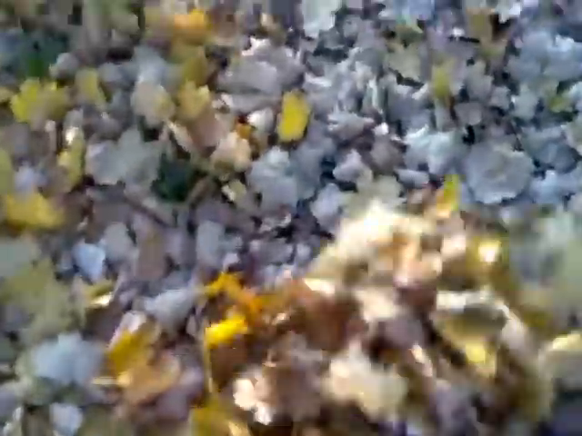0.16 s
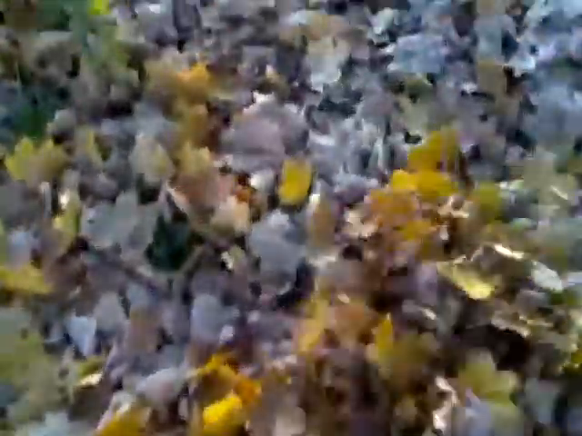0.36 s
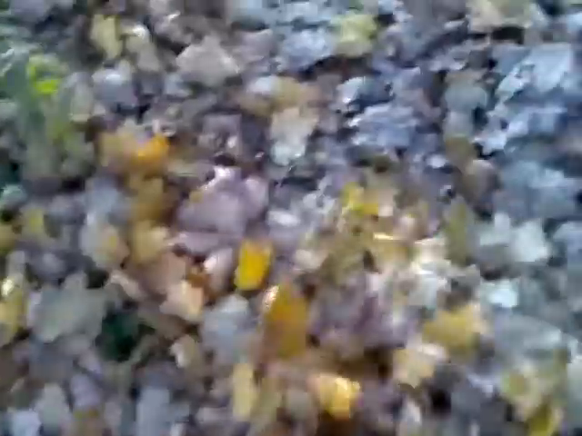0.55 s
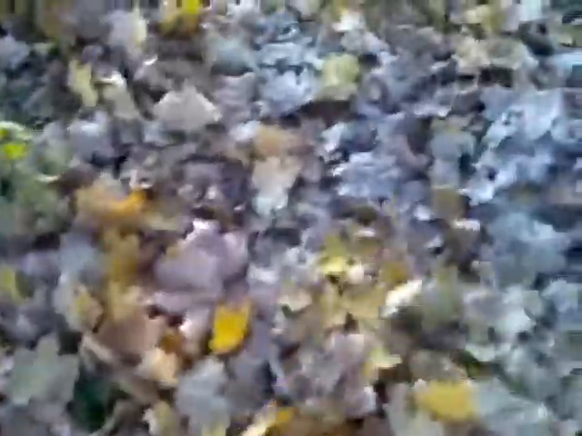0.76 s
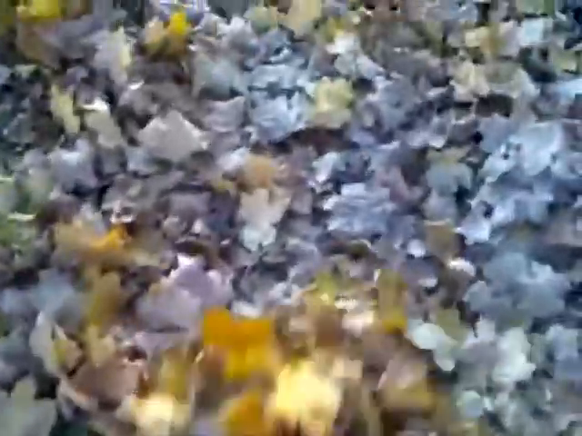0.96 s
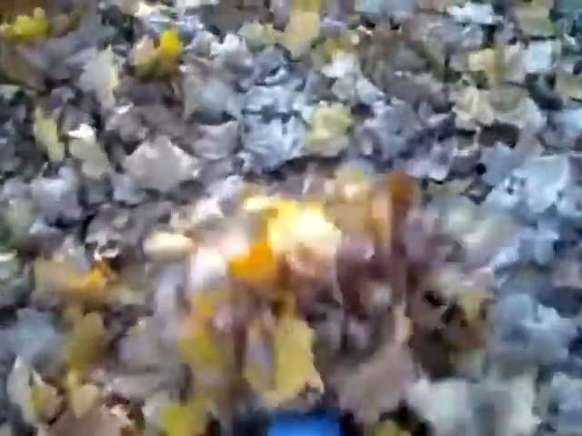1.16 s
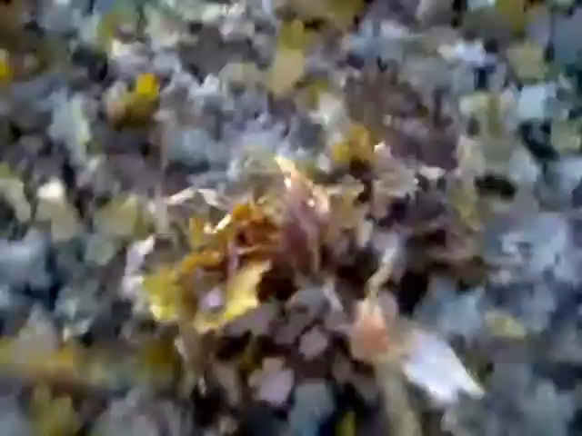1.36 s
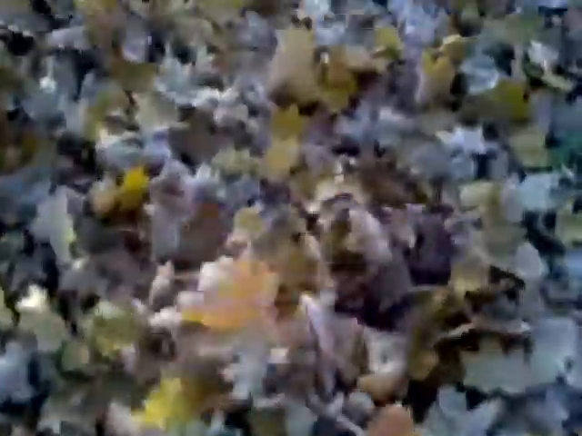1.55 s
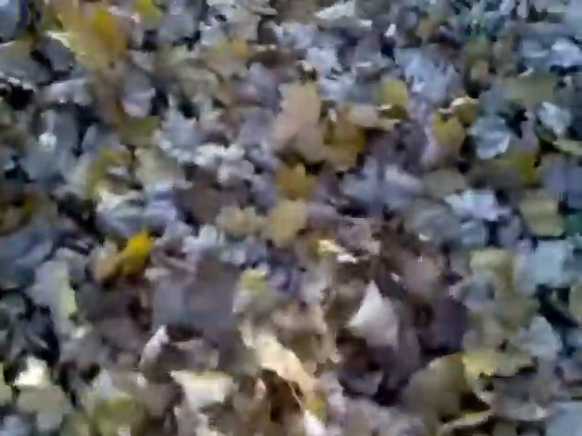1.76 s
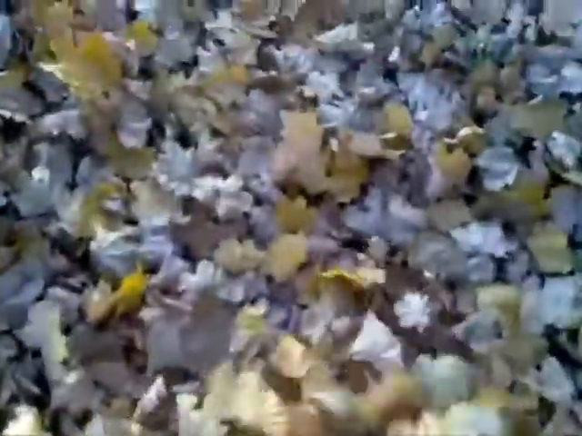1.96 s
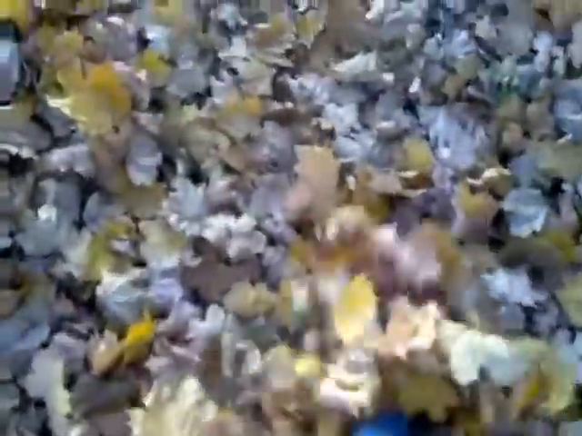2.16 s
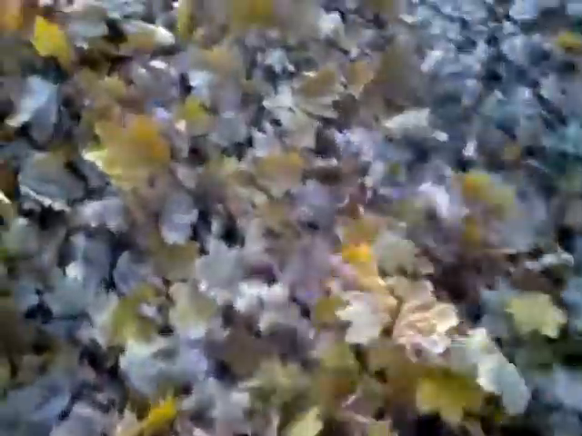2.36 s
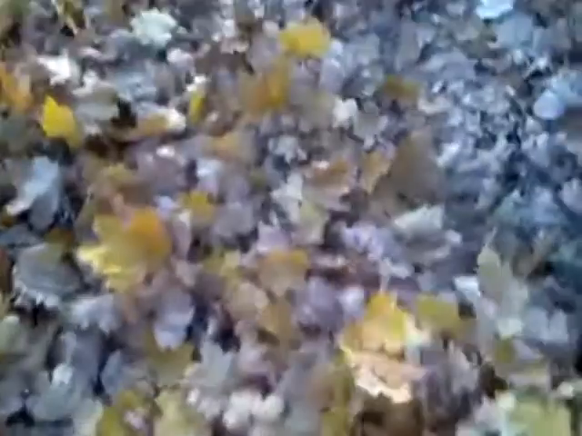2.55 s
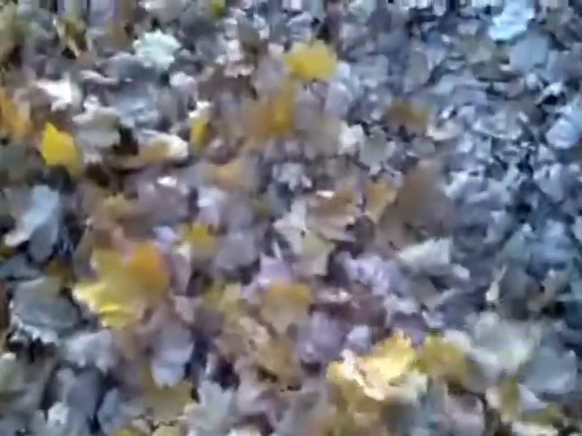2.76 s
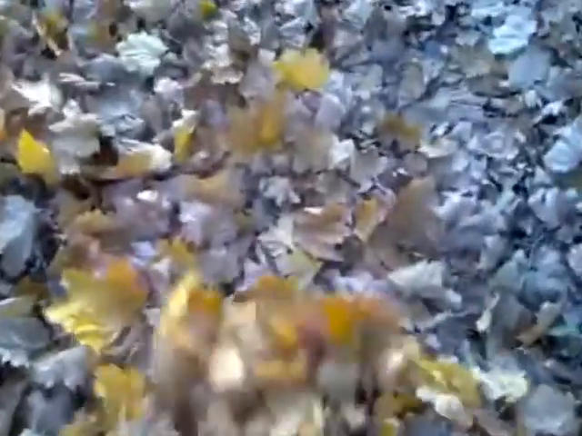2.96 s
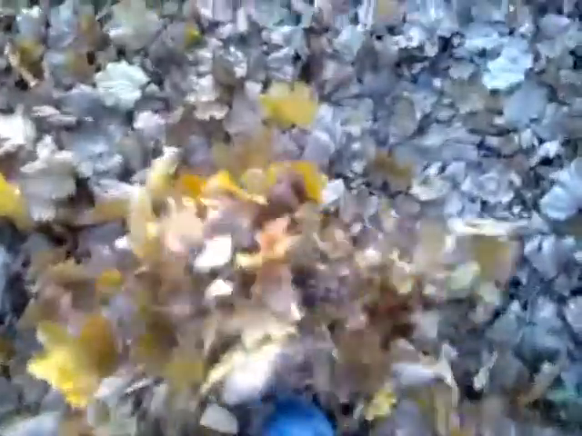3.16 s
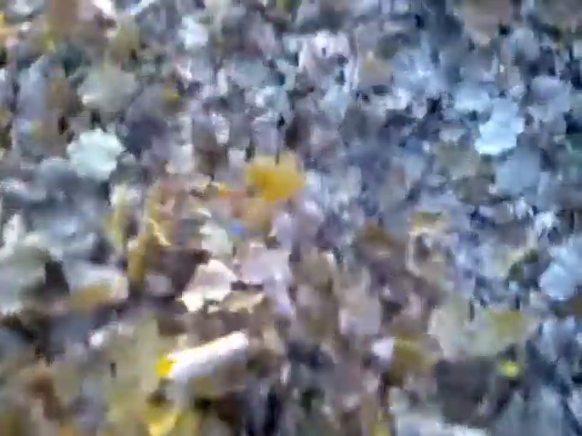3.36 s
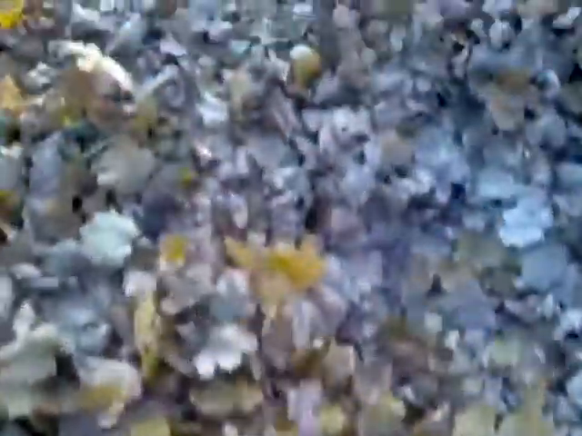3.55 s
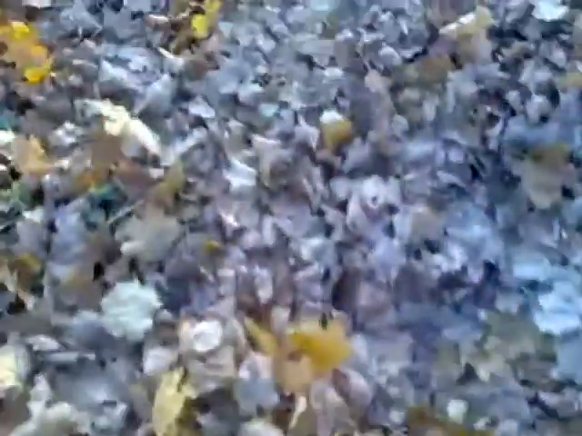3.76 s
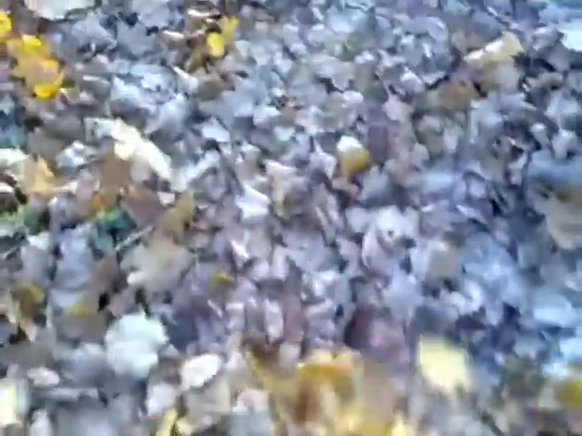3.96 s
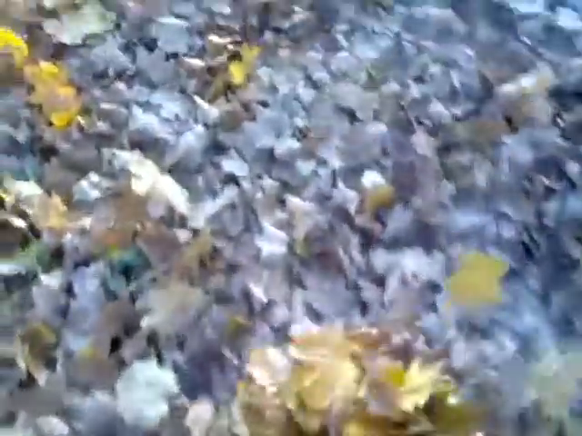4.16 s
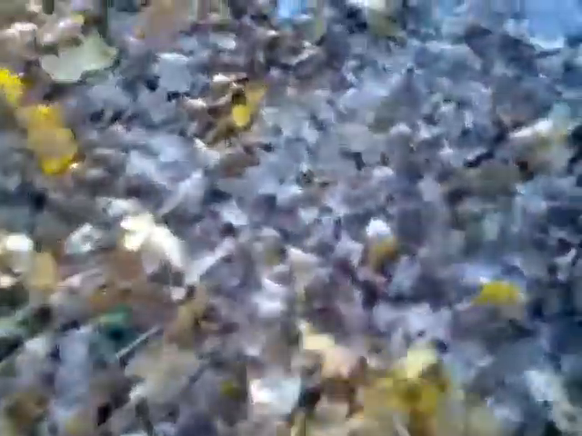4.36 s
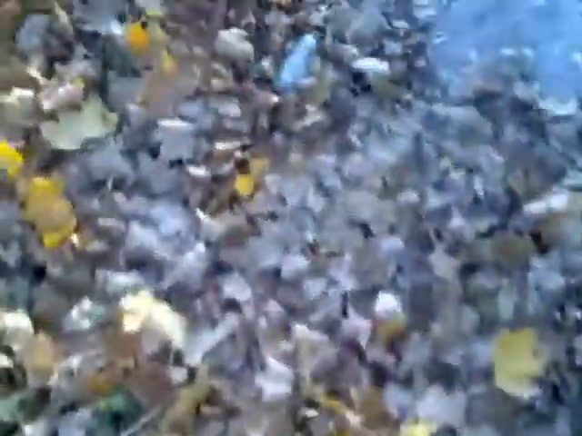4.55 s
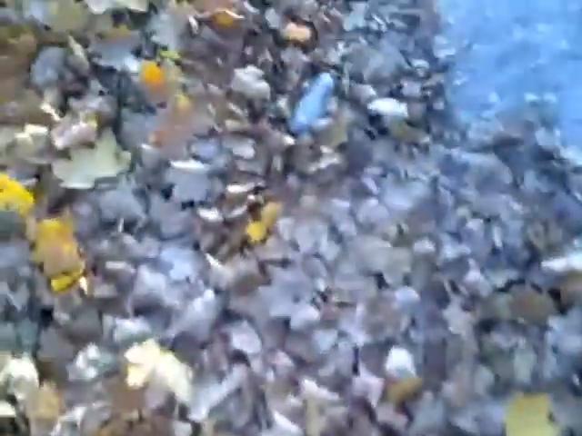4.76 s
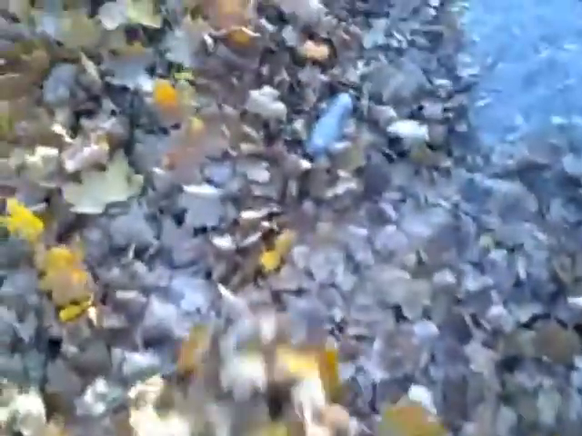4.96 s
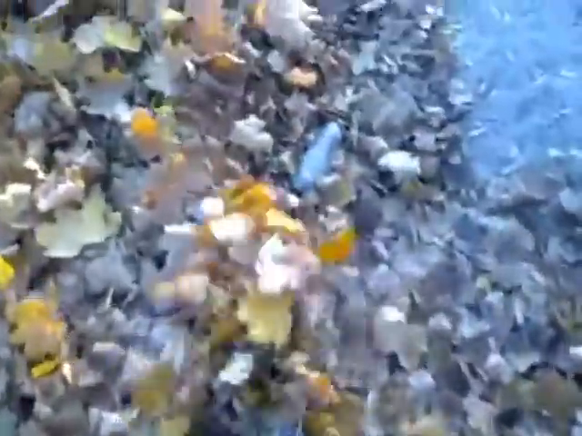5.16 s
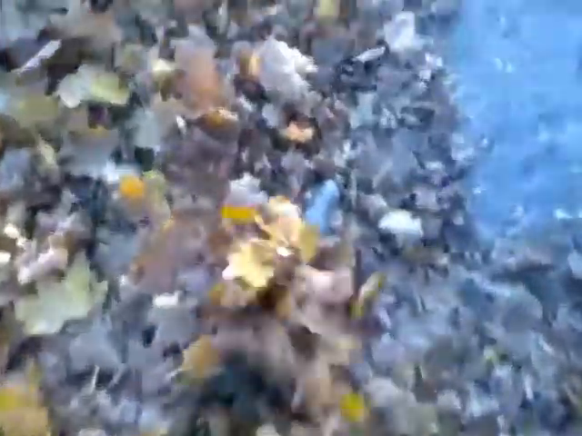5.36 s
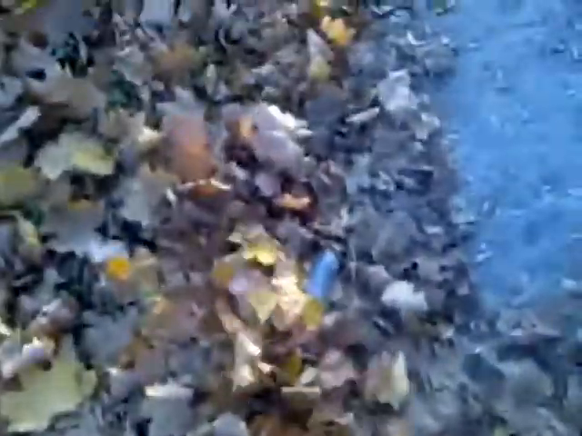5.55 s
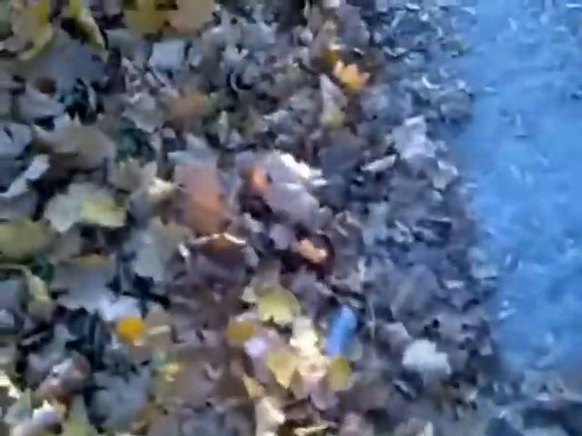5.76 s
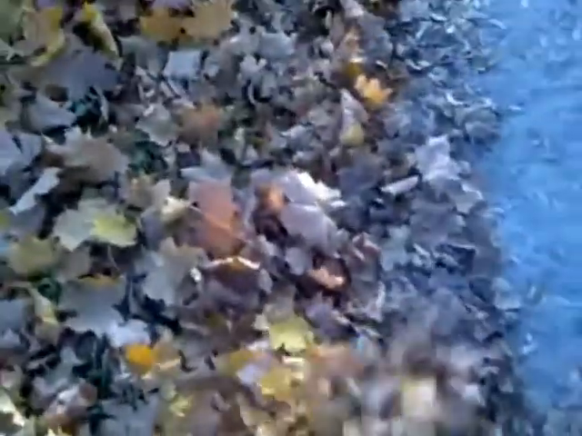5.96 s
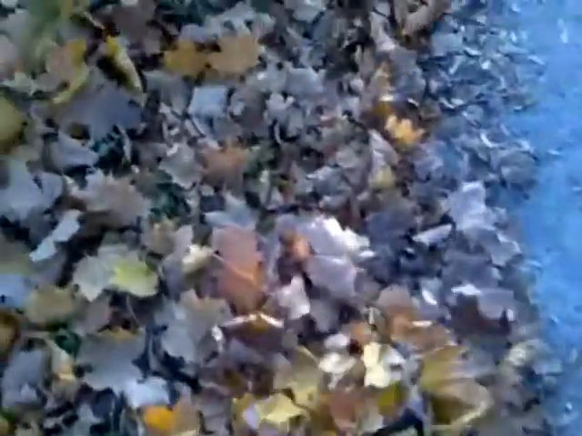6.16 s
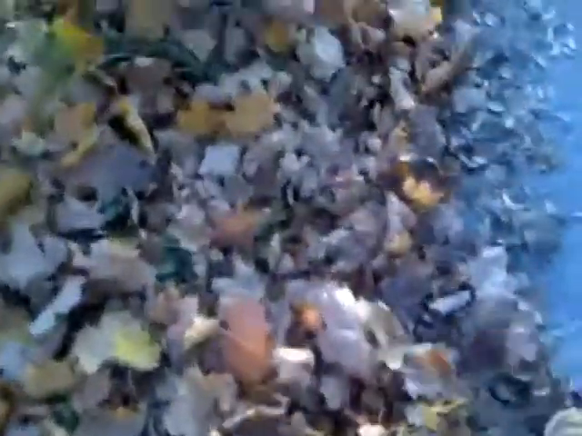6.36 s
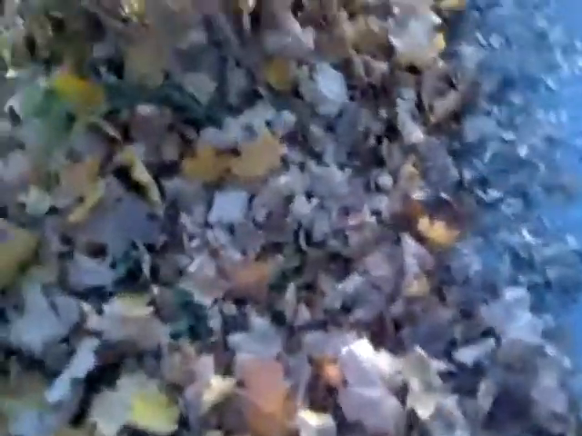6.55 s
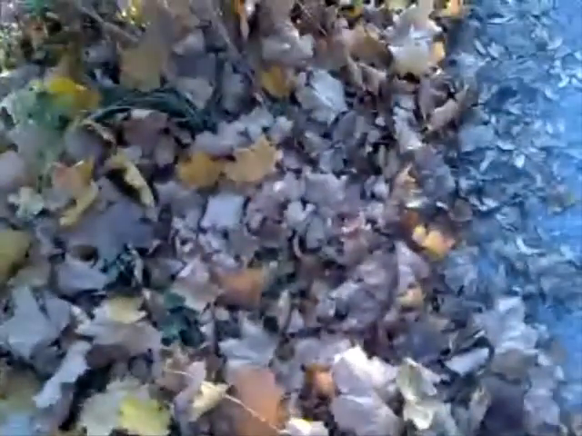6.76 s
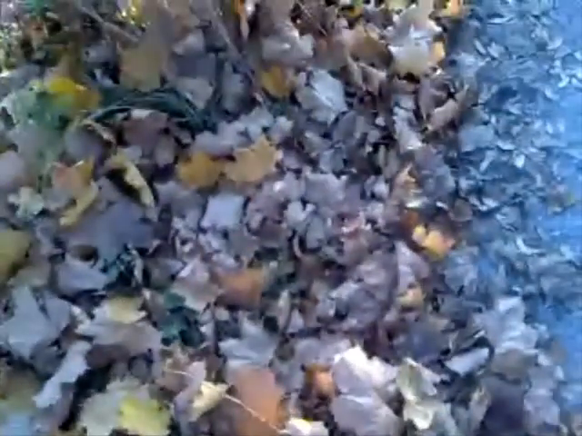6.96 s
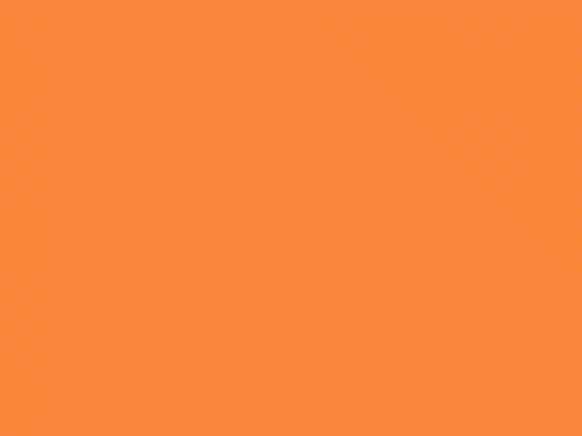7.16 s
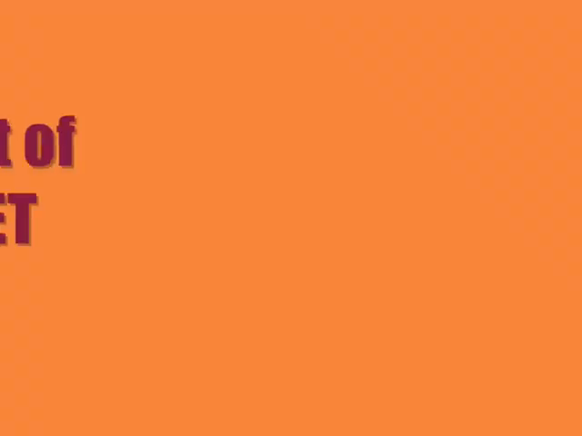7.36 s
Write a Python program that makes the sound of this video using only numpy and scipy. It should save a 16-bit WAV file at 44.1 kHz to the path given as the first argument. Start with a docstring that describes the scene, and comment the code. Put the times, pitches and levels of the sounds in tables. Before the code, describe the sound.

Someone wades through a deep layer of dry fallen leaves, heard close from above the feet. Seven strides come about a second apart, from 0.1 seconds to 6.1 seconds. Each swells quickly into a loud, crisp, grainy rush, with a darker rustle of the pressed pile beneath, and fades within the second. A shorter, softer step falls just before each stride, and the leaves keep settling quietly in between. Single brittle leaves snap throughout, most clearly at about 3.2 and 5.4 seconds. After a last light step near 6.7 seconds, the rustle drops. Between 6.8 and 7 seconds, a quick cluster of sharp, hard, thin cracks sounds right at the microphone, with soft dull bumps. A short faint hiss and two tiny bumps follow, and the sound stops abruptly at about 7.2 seconds.

```python
"""A rush of dry leaves, close by: someone wades through a deep layer of them, a stride a second,
with a mono microphone held above the feet. Each foot ploughs up a heap: thousands of tiny leaf
contacts merge into the rush, the pile rustles darkly under the shoe, and single brittle leaves snap.
At the end come a few sharp cracks close to the microphone, dull bumps and a short hiss."""
import sys
import numpy as np
from scipy import signal
from scipy.fft import rfft, irfft
from scipy.io import wavfile

SR = 44100
rng = np.random.default_rng(int(sys.argv[2]) if len(sys.argv) > 2 else 0)


def bounce(signal):
    """Save signal as a 16-bit WAV file at the path given by the first command-line argument."""
    frames = np.transpose(np.atleast_2d(signal))
    limited = np.clip(frames, -1, 1)
    pcm = np.round(limited * 32767).astype(np.int16)
    wavfile.write(sys.argv[1], SR, pcm)


N = 325893
TIME = np.arange(N) / SR


# Flexing leaf blades, their crisp edges and the pressed pile, heard from above the feet.
# Each: (frequency [Hz], relative level [dB])
BLADE_SPECTRUM = [(800, -20.5), (1300, -9), (1550, -8.5), (1850, -2), (2000, -3), (2370, 0.9), (2490, -1.5),
                  (2750, -0.5), (3080, -1.5), (3250, -3), (3600, -4.5), (4500, -12), (6500, -23)]
EDGE_SPECTRUM = [(2800, -16), (3900, -5.5), (4700, 0), (5000, -2), (5220, -1), (5450, -4.5), (5650, -5),
                 (5820, -7), (6300, -8.5), (7200, -16), (8200, -22.5), (10000, -25.5), (14000, -30),
                 (15600, -39)]
PILE_SPECTRUM = [(130, -59), (165, -45.5), (195, -28), (260, -15.5), (390, -10), (490, -3.5), (620, -0.5),
                 (780, -4.5), (1020, -1), (1250, -4.5), (1500, -1.5), (2400, -29.5)]

def leaves(peak_contacts_per_s=22000, rate_exponent=.7):
    """Harder stirring makes more contacts; they come in clumps as whole leaves catch and slip."""
    stirring_db = 10 * np.log10(kicks() + treads() + settling() + hiss())   # blades, edges, pile
    below_peak_db = stirring_db[0] - np.max(stirring_db[0])
    per_s = peak_contacts_per_s * from_db(rate_exponent * below_peak_db)
    blade_db, edge_db, pile_db = stirring_db + crunches_db()
    clumps = drift(76)   # shared by all three layers
    blades = coloured(contacts(per_s, spread_db=2.5), BLADE_SPECTRUM)
    blades *= from_db(blade_db + .5 * clumps + .55 * drift(35))
    edges = coloured(contacts(per_s, spread_db=2), EDGE_SPECTRUM)
    edges *= from_db(edge_db + .42 * clumps + .69 * drift(40))
    pile = coloured(contacts(.4 * per_s, spread_db=2), PILE_SPECTRUM)
    pile *= from_db(pile_db + .11 * clumps + 1.07 * drift(31))
    # now and then a stiff edge flicks loose and ticks above the rush
    ticks = coloured(contacts(110, spread_db=3.5), SNAP_SPECTRUM) * from_db(blade_db - 17)
    return blades + edges + pile + ticks


def contacts(per_s, spread_db):
    """Leaf touches leaf: tiny impulses, many faint, a few strong, with the same power at any rate."""
    chance = np.clip(per_s / SR, 1e-4, 1)
    sizes = from_db(spread_db * np.minimum(rng.exponential(1, N), 5))
    signs = rng.choice([-1, 1], N)
    touching = rng.random(N) < chance
    return rms_one(sizes * signs * touching / np.sqrt(chance))


# Strides below the microphone: (start [s], rise [s], hold [s], level [dB], edge trim [dB],
# pile trim [dB], sag [dB/s], release [dB/s], edge dulling [dB/s])
STRIDES = [(0.099, 0.19, 0.34, -20.5, -1, 1.3, 0.5, 60, -0.5),
           (1.091, .33, 0.23, -18.5, 0.9, -.4, 14, 54, 5),
           (2.106, 0.33, 0.2, -20.3, 0.2, -1.8, 10.5, 52.5, -2),
           (3.081, .26, 0.24, -19, 0.3, 0.6, 3.5, 66.5, 7),
           (4.024, 0.25, 0.36, -20, -0.8, 1.2, 8, 55.5, -4),
           (5.052, 0.28, 0.28, -18.5, 1.1, -0.1, 16.5, 83.5, 3.5),
           (6.082, 0.22, 0.21, -20, -0.1, 0, 6.5, 99.5, -7.5)]

def kicks():
    """Rustle power as each foot ploughs through the heap."""
    return sum(movement(*row) for row in STRIDES)


# Shorter, softer steps between the strides:
# (start [s], rise [s], hold [s], level [dB], edge trim [dB], pile trim [dB])
SOFT_STEPS = [(-0.038, 0.037, 0.043, -25, -2.5, 2), (0.775, 0.15, 0.06, -28, 1, 2),
              (1.86, 0.076, .101, -23.5, 0.5, -.9), (2.851, 0.053, 0.14, -23, -1.7, -0.5),
              (3.741, 0.14, 0.084, -23, -.1, -1.5), (4.86, .088, .069, -31.5, 1, 0),
              (5.71, 0.15, .09, -22.5, 1.2, -3), (6.681, .1, .04, -28, -2.5, -4)]

def treads():
    """Rustle power that dies fast, as the sole pins the leaves down at once."""
    return sum(movement(*row, sag_db_per_s=16.5, release_db_per_s=276) for row in SOFT_STEPS)


def movement(start, rise, hold, db, edge_trim_db, pile_trim_db, sag_db_per_s, release_db_per_s,
             dulling_db_per_s=0, thinning_db_per_s=6.4):
    """Rise, sagging hold and release of one movement, as power of the blades, edges and pile."""
    power = np.zeros((3, N))
    span = slice(max(int(start * SR), 0), int((start + 1.5) * SR))
    age = np.maximum(TIME[span] - start, 0)
    edge_db = db - 2.17 + edge_trim_db - dulling_db_per_s * (age - rise)
    # the dark rustle gives way as the heap thins
    pile_db = db - 9 + pile_trim_db - thinning_db_per_s * (age - rise)
    layers = [(rise, db), (rise, edge_db), (.96 * rise, pile_db)]   # the toe pushes the pile first
    for k, (rise_s, level_db) in enumerate(layers):
        attack = np.minimum(age / rise_s, 1)
        sag_db = sag_db_per_s * np.clip(age - rise_s, 0, hold)
        release_db = release_db_per_s * np.maximum(age - rise_s - hold, 0)
        power[k, span] = (attack * from_db(level_db - sag_db - release_db)) ** 2
    return power


# Crunches underfoot: (time [s], boost [dB], width [s])
CRUNCH_FLARES = [(1.426, 2.5, 0.0047), (2.007, 3.5, 0.0037), (2.418, 2, 0.0055), (3.47, 0.5, .035),
                 (4.17, 0.5, 0.0054), (4.378, 1, 0.0084), (4.421, 2.5, .005), (4.821, 3, .0025),
                 (5.383, 0, .012), (6.167, 4.5, 0.0027), (6.395, 3, 0.0028)]

def crunches_db():
    """Whole leaves give way and the rustle flares for a moment."""
    return sum(db * np.exp(-np.minimum(((TIME - s) / width_s) ** 2 / 2, 20))
               for s, db, width_s in CRUNCH_FLARES)


# Single leaves snapping on the ground: (time [s], peak level [dB])
LEAF_SNAPS = [(0.065, -10.5), (0.9688, -9.5), (1.6922, -8.5), (2.7758, -11.5), (3.1122, -11.5),
              (3.2092, -5.5), (4.0375, -14.5), (4.9617, -13.5), (5.0169, -12.5), (5.0535, -13.5),
              (5.4004, -3.5), (6.0843, -17.5), (6.6424, -13.5)]
# Their bright click: (frequency [Hz], relative level [dB])
SNAP_SPECTRUM = [(130, -62), (300, -38), (600, -5), (1400, -4), (2500, 10.5), (3700, -1), (5000, -4),
                 (6500, -17), (8200, -33), (15000, -34.5)]

def snaps(tail_s=.00038, tail_gain=.057, size=512):
    """A brittle leaf buckles: one click and a brief crumple after it."""
    out, age = np.zeros(N), np.arange(size) / SR
    click = click_response(SNAP_SPECTRUM)
    for s, peak_db in LEAF_SNAPS:
        crumple = tail_gain * rng.standard_normal(size) * np.exp(-age / tail_s)
        snap = signal.fftconvolve((age == 0) + crumple, click)
        envelope_peak = np.max(np.abs(signal.hilbert(snap)))
        add(out, s, from_db(peak_db) * snap / envelope_peak)
    return out


# Sharp cracks close to the microphone:
# (time [s], ring time [s], grit level [dB], then three pairs of frequency [Hz], level [dB])
CLOSE_CRACKS = [(6.8114, 0.00039, -18, 1300, -10, 1790, -2.5, 4700, -22),
                (6.8868, 0.00037, -5.5, 800, -17, 3100, 0, 4690, -2),
                (6.91, 0.00083, -39.5, 600, -28, 850, -27, 1100, -36.5),
                (6.9282, 0.0005, -7.5, 1440, -5.5, 2690, 0.5, 4970, -5),
                (6.9705, 0.00021, -13, 1420, -18, 2150, -3.5, 4500, 0.5),
                (7.0143, 0.0014, -19, 753, -17, 1160, -19, 2200, -20.5)]
# Their gritty tail: (frequency [Hz], relative level [dB])
GRIT_SPECTRUM = [(100, -28.5), (300, -5.5), (520, -4.5), (900, 3.5), (2500, 6.5), (5000, 5), (6500, -5.5),
                 (8200, -25), (13000, -27), (14000, -31.5)]

def cracks(grit_s=.0018, tail_db=-13, tail_s=.0043, low_cut_hz=400, size=2048):
    """Each crack swells and dies in three heavily damped resonances, with a gritty tail."""
    out, age = np.zeros(N), np.arange(size) / SR
    grit_decay = np.exp(-age / grit_s) + from_db(tail_db) * np.exp(-age / tail_s)
    for s, ring_s, grit_db, *modes in CLOSE_CRACKS:
        swell = age / ring_s * np.exp(1 - age / ring_s)
        rings = sum(from_db(db) * np.sin(2 * np.pi * hz * age)
                    for hz, db in zip(modes[::2], modes[1::2]))
        grit = coloured(rng.standard_normal(size) * grit_decay, GRIT_SPECTRUM)[:size]
        add(out, s, swell * rings + from_db(grit_db) * grit)
    # so close, the cracks overload and sound hard and thin, with little bass
    low_cut = signal.butter(2, low_cut_hz, "high", fs=SR, output="sos")
    return signal.sosfilt(low_cut, np.tanh(out))


# Leaves around the feet between steps: (time [s], level [dB])
SETTLING_LEVELS = [(0, -28), (1.1, -26.5), (2.1, -29.5), (3.1, -27.5), (4.05, -30), (5, -32.5),
                   (6.05, -31.5), (6.68, -35), (6.85, -33), (6.95, -32.5), (7.0, -40.5), (7.1, -37)]

def settling(edge_trim_db=-3.5, pile_trim_db=-8.5):
    """Stirred leaves go on settling: a low rustle power in the blades, edges and pile."""
    blade_db = np.interp(TIME, *np.transpose(SETTLING_LEVELS))
    return from_db([blade_db, blade_db + edge_trim_db, blade_db + pile_trim_db]) ** 2


# The hiss after the cracks: (start [s], rise [s], hold [s], level [dB], edge trim [dB],
# pile trim [dB], sag [dB/s], release [dB/s])
LAST_HISS = [(7.045, .02, 0.15, -35, -9, -2, -3, 300.5)]

def hiss():
    """Power of one last faint rustle, short and with little crispness."""
    return sum(movement(*row) for row in LAST_HISS)


# Dull bumps with and just after the close cracks: (time [s], level [dB])
DULL_BUMPS = [(6.82, -31), (6.887, -41), (6.928, -37), (7.144, -49), (7.19, -46)]

def bumps(hz=85, decay_s=.0051, size=2048):
    """A soft low push that lasts about one cycle."""
    out, age = np.zeros(N), np.arange(size) / SR
    push = np.sin(2 * np.pi * hz * age) * np.exp(-age / decay_s)
    for s, db in DULL_BUMPS:
        add(out, s, from_db(db) * push)
    return out


def rumble(level_db=-72.5):
    """A very faint low noise lies under everything."""
    spectrum = [(20, 30), (43, 2), (65, 1.5), (95, -18)]   # (frequency [Hz], relative level [dB])
    return from_db(level_db) * coloured(rng.standard_normal(N), spectrum)


def drift(hz, step=40, warm_up=2000):
    """Smooth random wander, mostly slower than hz, with an rms near 1."""
    pole = np.exp(-2 * np.pi * hz * step / SR)
    noise = rng.standard_normal(N // step + warm_up + 2)
    slow = signal.lfilter([1], [1, -2 * pole, pole * pole], noise)[warm_up:]
    return np.interp(np.arange(N) / step, np.arange(len(slow)), rms_one(slow))


def click_response(spectrum, size=2048):
    """Causal (minimum-phase) click with this spectrum and unit energy."""
    hz, db = np.transpose(spectrum)
    log_hz = np.log(np.maximum(np.fft.rfftfreq(size, 1 / SR), 1))
    beyond_ends = np.abs(log_hz - np.clip(log_hz, np.log(hz[0]), np.log(hz[-1])))
    shape_db = np.maximum(np.interp(log_hz, np.log(hz), db) - 50 * beyond_ends, -75)
    cepstrum = irfft(np.log(from_db(shape_db)))
    cepstrum[1:size // 2] *= 2
    cepstrum[size // 2 + 1:] = 0
    click = irfft(np.exp(rfft(cepstrum)))
    return click / np.linalg.norm(click)


def coloured(x, spectrum):
    """Let every impulse in x ring with this spectrum."""
    return signal.oaconvolve(x, click_response(spectrum))[:N]


def add(out, s, sound):
    """Mix a short sound in at time s."""
    start = int(np.clip(round(s * SR), 0, N - len(sound)))
    out[start:start + len(sound)] += sound


def from_db(db):
    """Decibels to gain."""
    return 10 ** (np.asarray(db) / 20)


def rms_one(x):
    """Scale to an rms of 1."""
    return x / np.sqrt(np.mean(x ** 2) + 1e-20)


def scene():
    """All sources reach one microphone above the feet, the same in both channels."""
    mono = leaves() + snaps() + cracks() + bumps() + rumble()
    return np.array([mono, mono])


def record(dry):
    """The sound stops abruptly, any peak over full scale clips, and the top treble is cut."""
    stop_s, fade_s, cutoff_hz = 7.218, .002, 15400
    gate = np.clip((stop_s - TIME) / fade_s, 0, 1)
    low_pass = signal.ellip(10, .1, 80, cutoff_hz, fs=SR, output="sos")
    return signal.sosfilt(low_pass, np.clip(dry * gate, -1, 1))


dry = scene()
out = record(dry)
bounce(out)
```